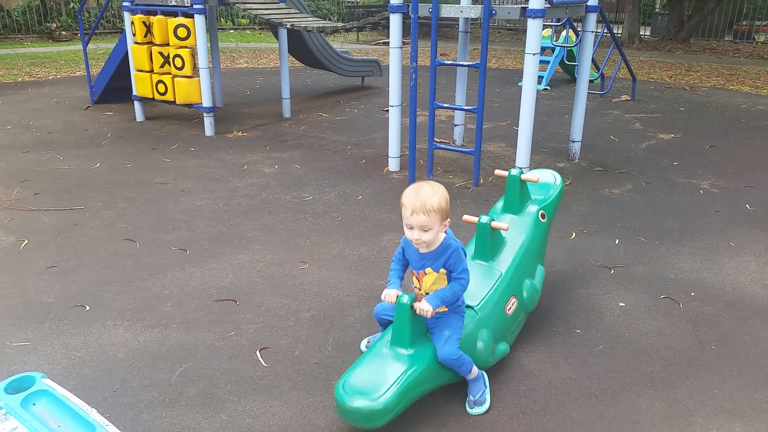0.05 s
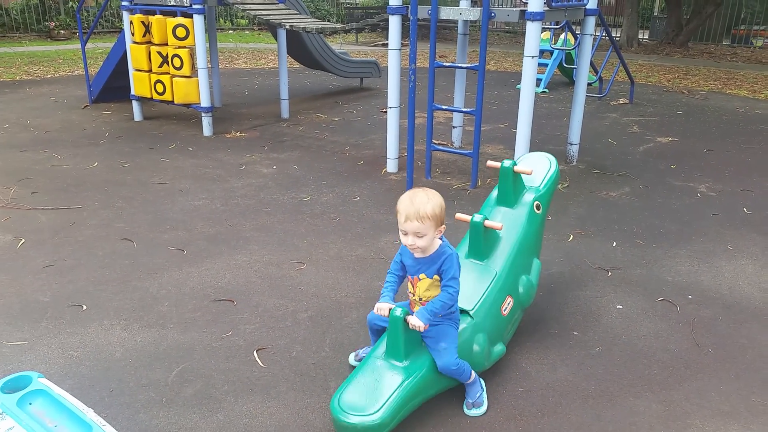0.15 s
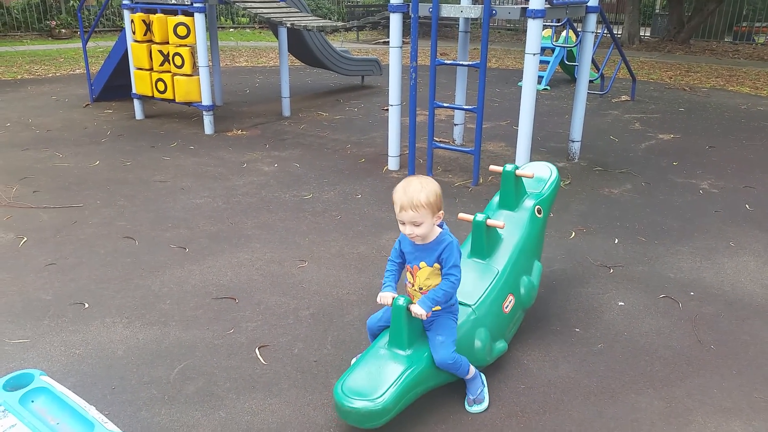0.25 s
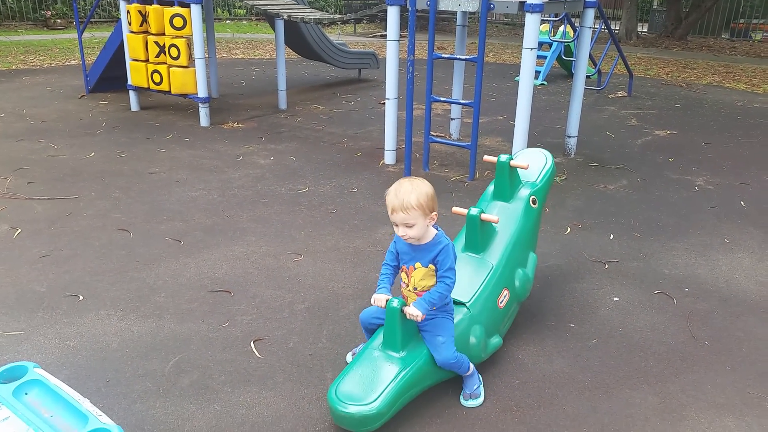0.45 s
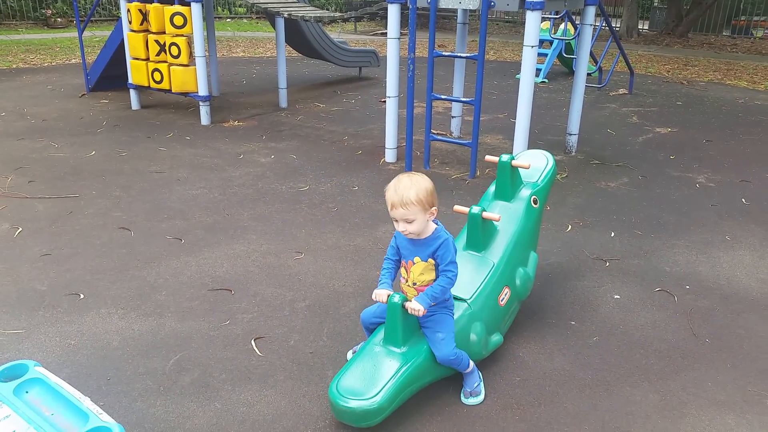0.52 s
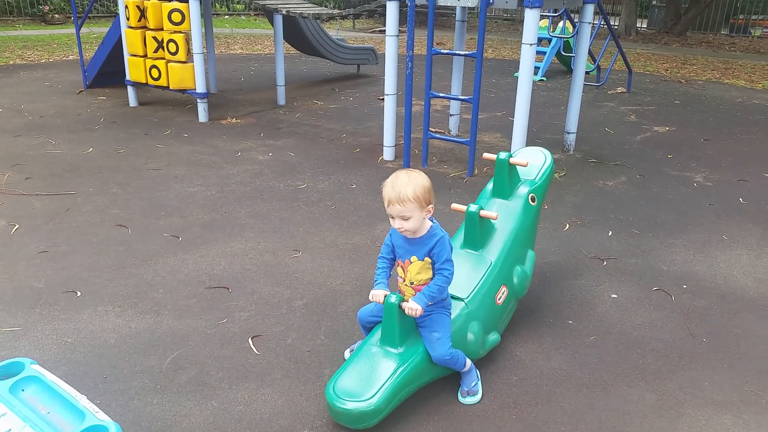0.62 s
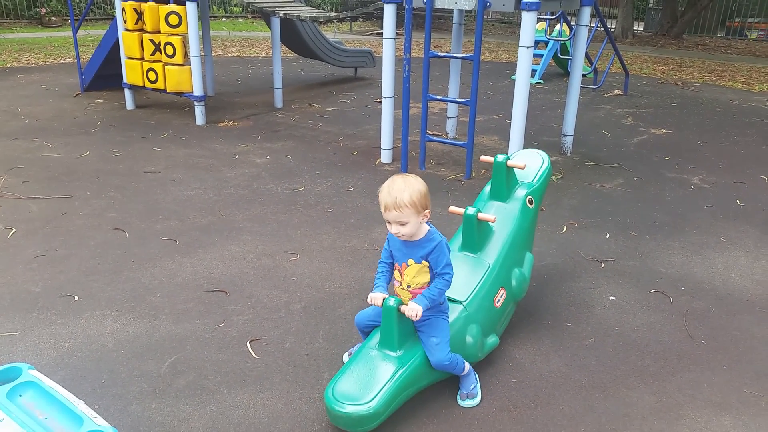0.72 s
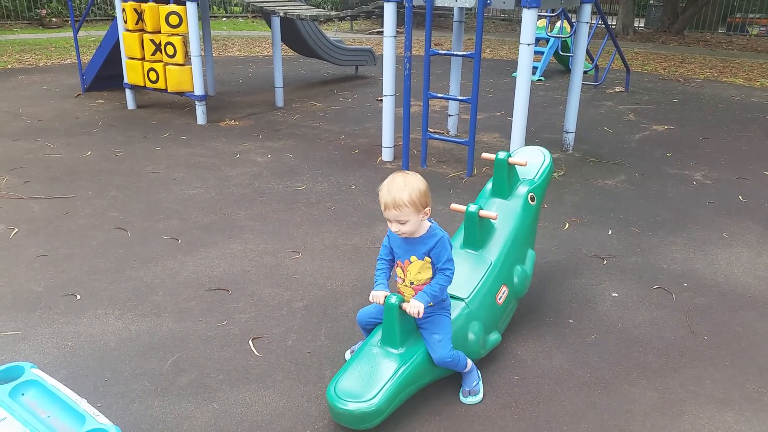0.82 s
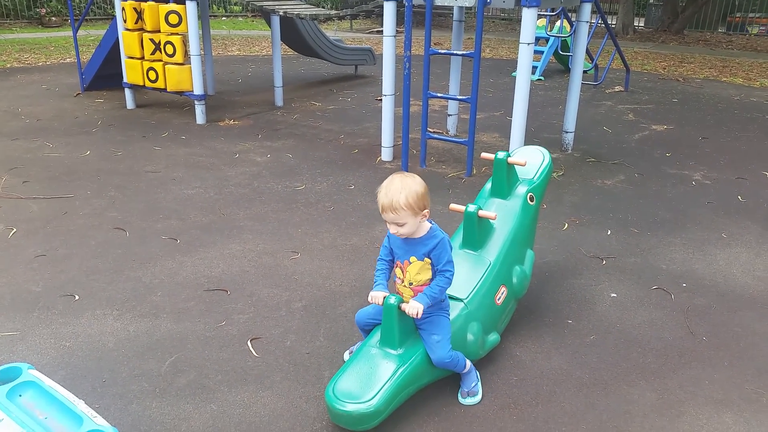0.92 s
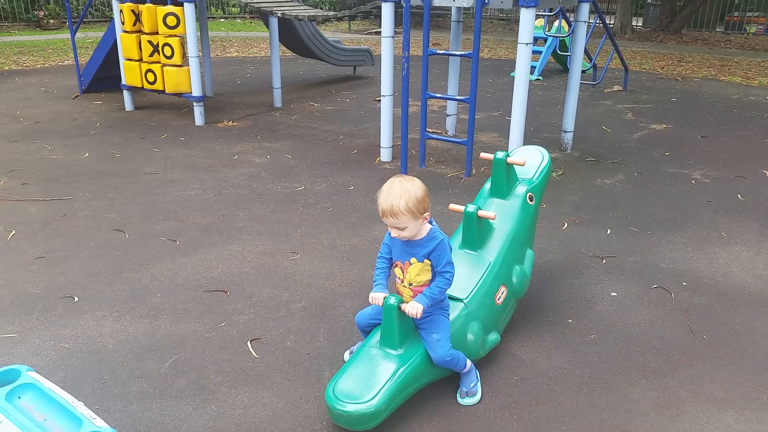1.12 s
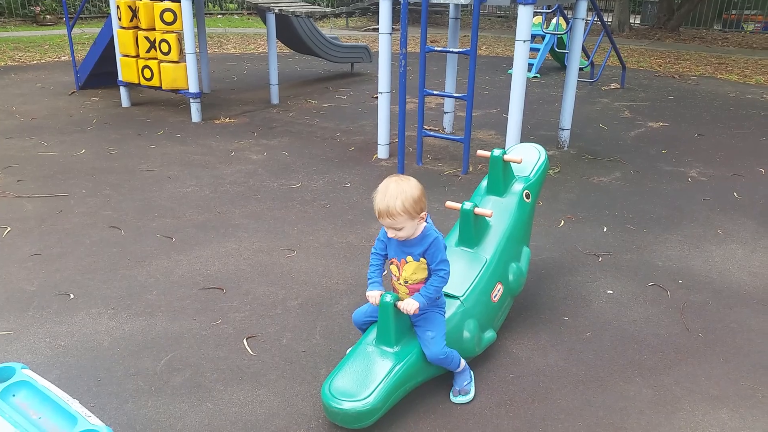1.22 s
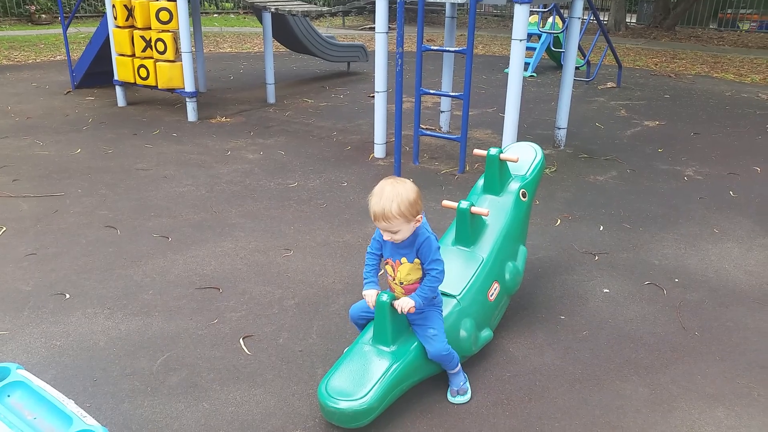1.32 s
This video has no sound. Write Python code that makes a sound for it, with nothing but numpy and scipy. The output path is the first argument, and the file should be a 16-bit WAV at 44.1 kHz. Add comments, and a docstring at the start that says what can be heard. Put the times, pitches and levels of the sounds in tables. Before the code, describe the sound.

Outdoors, a plastic rocking toy lands nearby with a hollow thump and sharp clack, over a faint rustle of clothes. Its shell rattles briefly, then bumps again more gently. Far-off traffic hums steadily behind the playground.

```python
"""A playground, a stereo microphone close to a hollow plastic rocker, distant traffic rumbling and droning.
Clothes rustle as the rocker tips onto rubber paving: a soft thump, a hard clack of the shell 20 ms later,
then a short rattle. Grit ticks under it and the playground scatters a short echo.
It settles with a softer bump, and a last few ticks sound against the traffic."""
import sys
import numpy as np
from scipy import signal
from scipy.fft import rfft, irfft, next_fast_len
from scipy.io import wavfile
from scipy.ndimage import map_coordinates

SR = 44100
rng = np.random.default_rng(int(sys.argv[2]) if len(sys.argv) > 2 else 0)


def log_audio(samples):
    """Write samples as a 16-bit WAV file to the path given in sys.argv[1]."""
    # one column per channel
    frames = np.atleast_2d(samples).T
    # limit to full scale, then quantise
    limited = np.clip(frames, -1, 1)
    pcm = np.round(limited * 32767).astype(np.int16)
    wavfile.write(sys.argv[1], SR, pcm)


N = 59535
RING_S, PUFF_S = .5, .08  # lengths of ringing sounds and of brief contacts


def amp(db):
    """Decibels to gain."""
    return 10 ** (np.asarray(db) / 20)


def unit(x):
    """Scale to rms 1."""
    return x / np.sqrt(np.mean(x ** 2) + 1e-20)


def along(points, hz):
    """(Hz, value) points read on a log axis."""
    f, v = np.transpose(points)
    return np.interp(np.log(hz + 1), np.log(f + 1), v)


def wobble(rate):
    """A smooth random curve, rate knots a second."""
    return map_coordinates(rng.standard_normal(int(N * rate / SR) + 4), [np.arange(N) * rate / SR])


def since(s):
    """Seconds since s, zero before it."""
    return np.maximum(np.arange(N) / SR - s, 0)


def placed(s, sound):
    """A short sound set into the scene at time s."""
    out, start = np.zeros((2, N)), round(s * SR)
    out[:, start:start + sound.shape[-1]] = sound[..., :N - start]
    return out


def filtered(x, response):
    """x times a response of frequency."""
    size = x.shape[-1]
    padded = next_fast_len(size + size // 8)
    return irfft(rfft(x, padded) * response(np.fft.rfftfreq(padded, 1 / SR)), padded)[..., :size]


def panned(x, pan):
    """Tilt left against right, frequency by frequency."""
    return filtered(x, lambda hz: amp(np.outer([.5, -.5], along(pan, hz))))


def noise(spectrum, alike, size=N):
    """Coloured stereo noise with the given left-right likeness."""
    def mid_side_gains(hz):
        turn = np.arccos(np.clip(along(alike, hz), -1, 1)) / 2
        return amp(along(spectrum, hz)) * [np.cos(turn), np.sin(turn)]
    mid, side = filtered(rng.standard_normal((2, size)), mid_side_gains)
    return np.array([mid + side, mid - side])


# Tyres on a far road. Each row: frequency in Hz, relative level in dB.
TYRE_COLOUR = [(150, -11), (260, -2.5), (430, -8), (600, -3), (800, -0.5), (1050, -6.5), (1350, -5.5),
               (1700, -14.5), (2350, -17), (2950, -28), (4400, -24.5), (5500, -33.5), (7000, -31),
               (10000, -46), (14500, -43)]
# Their width at the microphone. Each row: frequency in Hz, left-right likeness.
TYRE_ALIKE = [(250, 0.93), (700, 0.63), (1300, 0), (2500, 0.0028), (10000, 0)]
# Their direction. Each row: frequency in Hz, left minus right in dB.
TYRE_PAN = [(500, -.7), (2300, -1), (4300, -5.5), (7000, -8), (13000, 7)]


def tyre_wash():
    """Far tyres blend into a gently wavering wash."""
    wash = panned(noise(TYRE_COLOUR, TYRE_ALIKE), TYRE_PAN)
    return amp(-41 + .46 * wobble(6.8)) * unit(wash)


# The low end of that road. Each row: frequency in Hz, relative level in dB.
RUMBLE_COLOUR = [(15, -6), (30, -5), (50, 1.5), (78, 2.5), (110, 0.5), (150, -3), (200, -2.5), (260, -12),
                 (400, -42)]
# Its width. Each row: frequency in Hz, left-right likeness.
RUMBLE_ALIKE = [(25, 0.33), (70, 0.93), (300, 0.73)]


def traffic_rumble():
    """Distant traffic arrives as steady, deep noise."""
    return amp(-37.5) * unit(noise(RUMBLE_COLOUR, RUMBLE_ALIKE))


# One engine, far off. Each row: time in seconds, pitch in Hz, level in dB.
DRONE = [(0, 79.3, -42.5), (0.172, 80.1, -36.5), (0.249, 99.93, -39), (.42, 102.5, -36.5),
         (.62, 100.4, -37), (.8, 103.9, -36), (.88, 105.3, -37.5), (.95, 105.1, -29.5), (1.04, 107.7, -42),
         (1.13, 108.1, -35), (1.35, 107, -41)]


def engine_drone():
    """A single low tone that wavers in pitch and level."""
    s, pitch, level = np.transpose(DRONE)
    hz = np.interp(since(0), s, pitch)
    db = np.interp(since(0), s, level) + 1.38 * wobble(22.105)
    phase = 2 * np.pi * np.cumsum(hz) / SR + .36 * wobble(25)
    return amp(db) * unit(np.sin(phase))


# The playground around the microphone. Each row: frequency in Hz, seconds to fall 60 dB.
ECHO_T60 = [(150, 0.8), (700, 0), (2000, 0.32), (5000, 0.54), (12000, 0.8)]
# What it sends back. Each row: frequency in Hz, gain in dB.
ECHO_GAIN = [(100, -15), (220, -12.5), (400, -9), (700, -9), (2000, -8), (4000, -6.5), (9000, -5.5),
             (13000, -16)]
# Width of the echo, and of the rustle too. Each row: frequency in Hz, left-right likeness.
DIFFUSE_ALIKE = [(200, 1), (800, .92), (2000, .8), (4500, .2), (10000, 0.15)]


def playground_echo(x):
    """Scatter from the ground and the climbing frames, each frequency dying at its own speed."""
    scatter = noise(ECHO_GAIN, DIFFUSE_ALIKE, size=int(RING_S * SR))
    hz, t, bands = signal.stft(scatter, SR, nperseg=256)
    t60 = along(ECHO_T60, hz)[:, None]
    fade = amp(-60 * t / t60) * np.sqrt(2 * np.log(1000) / (t60 * SR))  # longer tails start lower
    tail = signal.istft(bands * fade, SR, nperseg=256)[1]
    onset = 1 - np.exp(-since(.003)[:tail.shape[1]] / .0035)
    return signal.fftconvolve(x, tail * onset, axes=1)[:, :N]


# Clothes, right of the microphone. Each row: frequency in Hz, relative level in dB.
RUSTLE_COLOUR = [(1500, -30), (3000, -9), (3800, -7), (4500, 0), (5600, -8), (7000, -6), (9500, -9),
                 (12000, -22)]


def clothes_rustle(fade_from_s=.14, t60=.6):
    """Cloth rubs the plastic: a faint, uneven swish that fades as the rocker lands."""
    db = -58.5 + 1.5 * wobble(60) - 60 * since(fade_from_s) / t60
    return amp([[-3], [3]]) * amp(db) * unit(noise(RUSTLE_COLOUR, DIFFUSE_ALIKE))


# Width of contacts close to the microphone. Each row: frequency in Hz, left-right likeness.
NEAR_ALIKE = [(800, 0.95), (2000, 0.65), (4500, .25), (10000, -.2)]


def contact(s, spectrum, hold_s, t60, rise_s=.0003):
    """A short puff of noise that rises, holds and dies."""
    t = np.arange(int(PUFF_S * SR)) / SR
    envelope = (1 - np.exp(-t / rise_s)) ** 2 * amp(-60 * np.maximum(t - hold_s, 0) / t60)
    puff = noise(spectrum, NEAR_ALIKE, size=len(t)) * envelope
    return placed(s, unit(puff) * np.sqrt(np.mean(envelope ** 2)))


# Grit under the rocker. Each row: start in seconds, level in dB.
GRIT_TICKS = [(.2275, -40), (.2497, -33.5), (.5514, -49), (0.9057, -51), (1.2586, -53)]
# One tick, close up. Each row: frequency in Hz, relative level in dB.
GRIT_COLOUR = [(1500, -29), (4300, 2), (5700, -5), (7500, 0), (10000, -3), (13000, -6)]


def grit():
    """Grains crushed between shell and paving give tiny bright ticks."""
    return sum(amp(db) * contact(s, GRIT_COLOUR, hold_s=.0022, t60=.012) for s, db in GRIT_TICKS)


# Slaps on the rubber paving. Each row: start in seconds, level in dB, pitch in Hz.
SLAPS = [(.179, -25, 1450), (.1805, -21, 900), (.2275, -12, 800), (.5385, -33.5, 760), (.666, -27, 750)]


def slaps(t60=.011):
    """The dull tock of the underside meeting the ground."""
    t = np.arange(int(PUFF_S * SR)) / SR
    return sum(placed(s, amp(db - 60 * t / t60) * np.sin(2 * np.pi * hz * t)) for s, db, hz in SLAPS)


# The shell's crack, close up. Each row: frequency in Hz, relative level in dB.
CRACK_COLOUR = [(150, -10), (300, 0), (450, 0), (750, 2), (1050, -3), (1400, -4.5), (2000, -3.5),
                (2400, -9), (2850, -8), (3300, -17), (4700, -18), (5800, -27), (8000, -28), (14000, -42)]


def shell_crack(s, hold_s=.0025, t60=.022):
    """Struck plastic gives a brief, broad crack."""
    return contact(s, CRACK_COLOUR, hold_s, t60)


def rattle(start_s=.256, length_s=.11, fall_db_per_s=172, count=12):
    """The shell chatters after the clack: small, fading re-contacts at uneven times."""
    delays = length_s * (np.arange(count) + rng.random(count)) / count
    return sum(amp(-27 - fall_db_per_s * delay) * shell_crack(start_s + delay, hold_s=.001, t60=.018)
               for delay in delays)


# The rocker's modes. Each row: frequency in Hz, relative peak in dB, seconds to fall 60 dB,
# rise time in seconds.
ROCKER_MODES = [(65.6, -31, 0.32, .012), (93, -18, .25, .012), (119.9, -12, .22, .012),
                (172, -24, .22, 0.018), (208, -10.5, .13, .002), (244, -25, .22, .02),
                (282, -23.5, .19, .02), (342, -28, .19, .025), (378, -24, .17, .025),
                (515, -23, .07, 0.00039), (552, -31, .1, .001), (595, -23, .07, 0.0003),
                (685, -21, .11, 0.00057), (777, -19, .05, 0.00074), (965, -21.5, .055, 0.00027),
                (1160, -26, .07, 0.00051), (1327, -27, .06, 0.00023), (1528, -26, .055, 0.00023),
                (1932, -22, .03, .0003), (2430, -33, 0.058, 0.00026), (2764, -26, .025, .0003)]
# Blows close to the microphone; the rider's weight follows each landing as a deep push.
# Each row: start in seconds, ring strength in dB, low and high band edges in Hz, relative crack in dB.
BLOWS = [(0.1785, -17, 240, 600, -29), (0.2274, 0, 115, 330, -22), (0.2497, 1.5, 260, 4000, 0),
         (.2525, 1.5, 40, 125, -40), (.3185, -21, 700, 2010, -28), (.487, -22, 70, 170, -45),
         (.5385, -7.5, 165, 170, -30), (.561, -12, 40, 110, -45), (.666, -21, 280, 500, -42)]


def rocker():
    """Each blow cracks and rings the modes in its band; the hollow body swells slower than the wall."""
    t = np.arange(int(RING_S * SR)) / SR
    hz, peak_db, t60, rise_s = np.transpose(ROCKER_MODES)[:, :, None]
    envelopes = (1 - np.exp(-t / rise_s)) ** 2 * amp(-60 * t / t60)
    envelopes /= envelopes.max(axis=1, keepdims=True)
    polarity = (-1) ** np.arange(len(hz))[:, None]
    rings = polarity * amp(peak_db) * envelopes * np.sin(2 * np.pi * hz * t)
    out = np.zeros((2, N))
    for s, strength_db, low_hz, high_hz, crack_db in BLOWS:
        share = 1 / np.sqrt((1 + (low_hz / hz) ** 6) * (1 + (hz / high_hz) ** 4))
        out += placed(s, amp(strength_db) * share.T @ rings)
        out += amp(crack_db - 12.5) * shell_crack(s)
    return out


# Where the rocker and its echo sit. Each row: frequency in Hz, left minus right in dB.
ROCKER_PAN = [(200, -1.5), (2500, -1), (4300, -8.5), (10000, -8)]


def scene():
    """The rocker close by and a little right of the microphone, the traffic far behind."""
    near = rocker() + slaps() + rattle() + grit()
    playground = panned(near + playground_echo(near), ROCKER_PAN) + clothes_rustle()
    traffic = tyre_wash() + (traffic_rumble() + engine_drone()) * amp([[-.6], [.6]])
    return playground + traffic


def record(dry, top_hz=14400):
    """The recorder keeps nothing above its band limit."""
    return filtered(dry, lambda hz: 1 / np.sqrt(1 + (hz / top_hz) ** 300))


dry = scene()
out = record(dry)
log_audio(out)
```